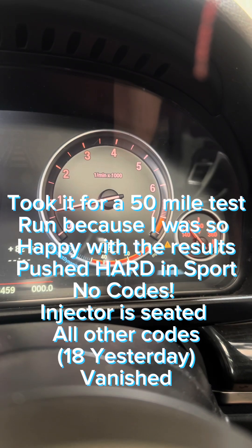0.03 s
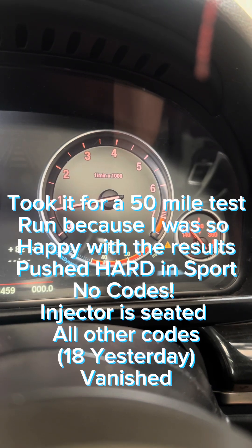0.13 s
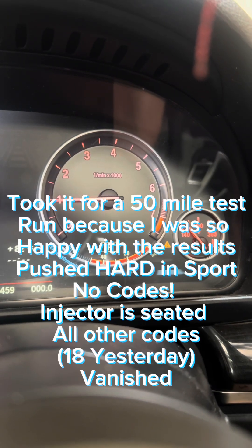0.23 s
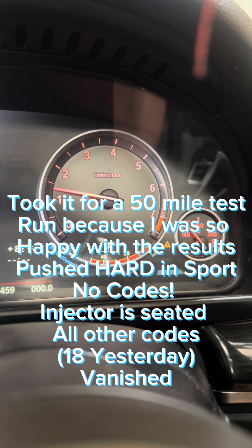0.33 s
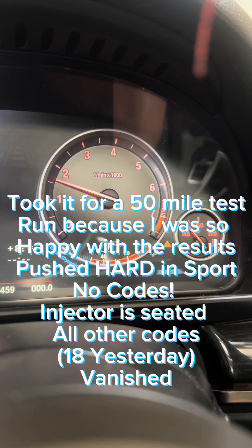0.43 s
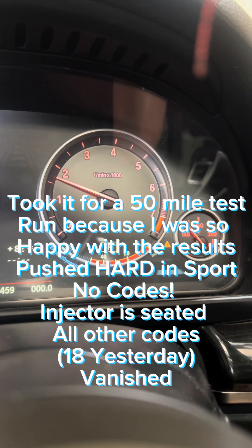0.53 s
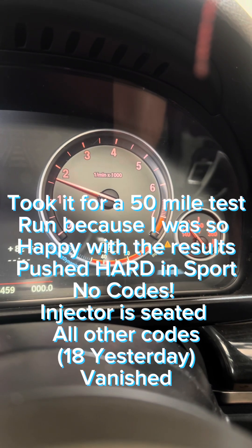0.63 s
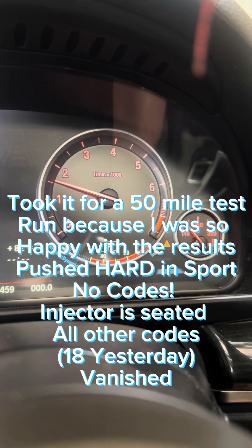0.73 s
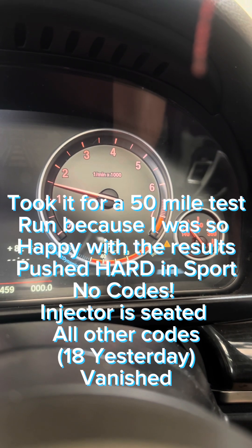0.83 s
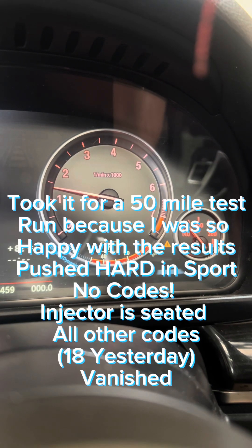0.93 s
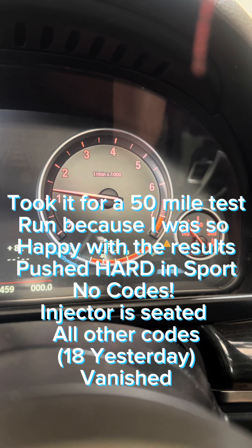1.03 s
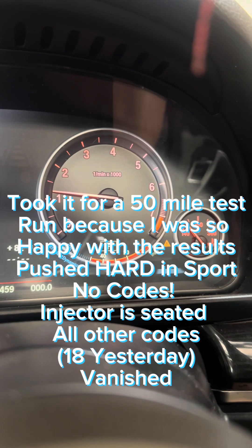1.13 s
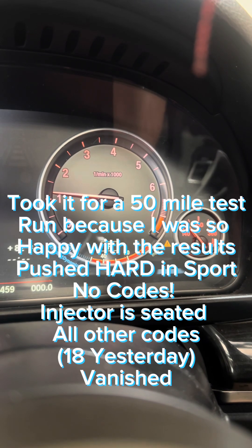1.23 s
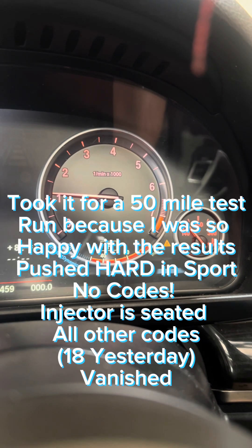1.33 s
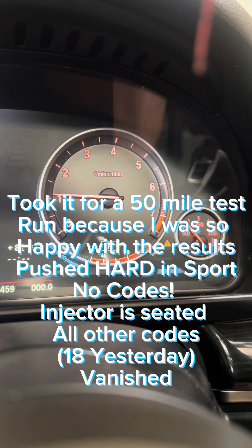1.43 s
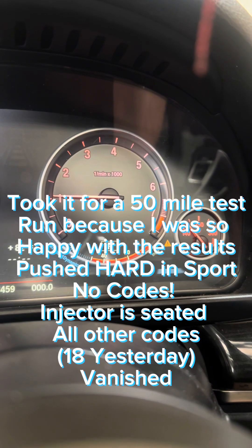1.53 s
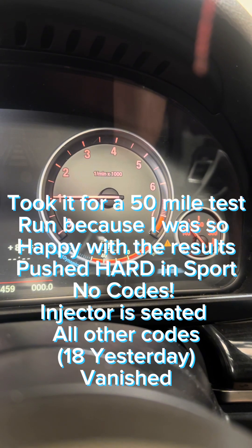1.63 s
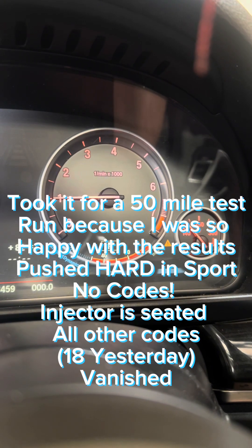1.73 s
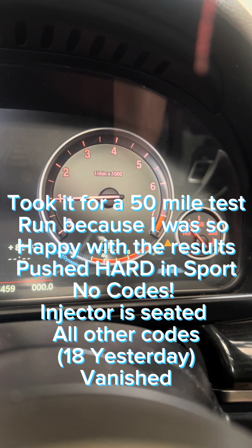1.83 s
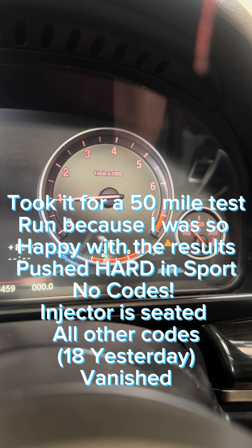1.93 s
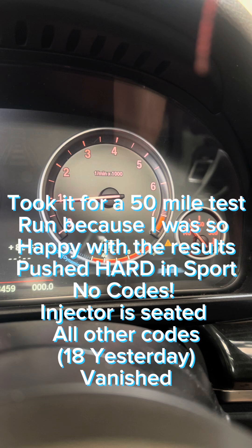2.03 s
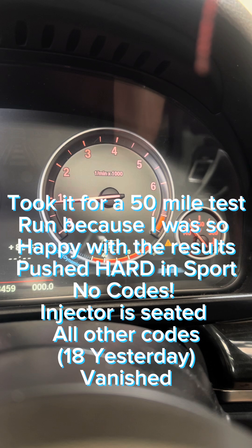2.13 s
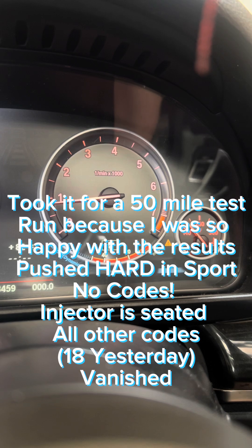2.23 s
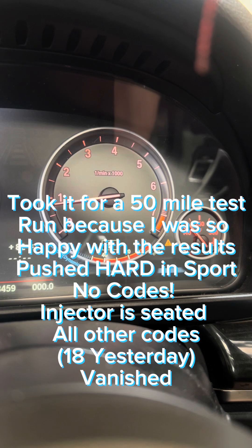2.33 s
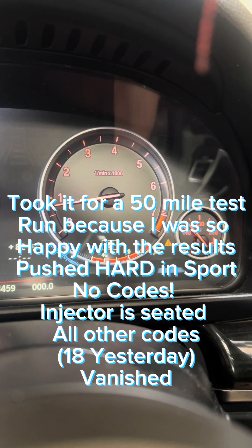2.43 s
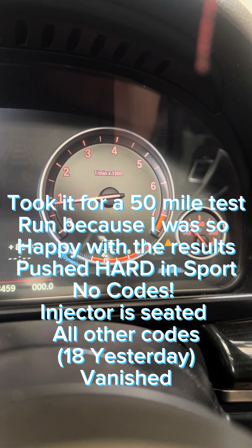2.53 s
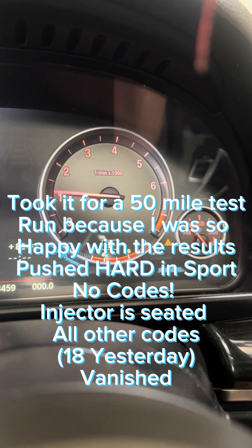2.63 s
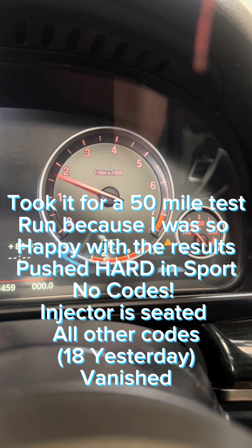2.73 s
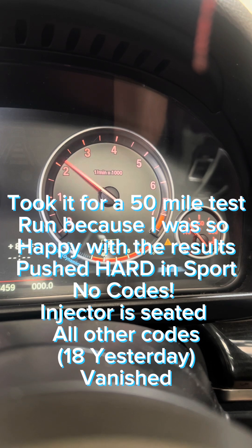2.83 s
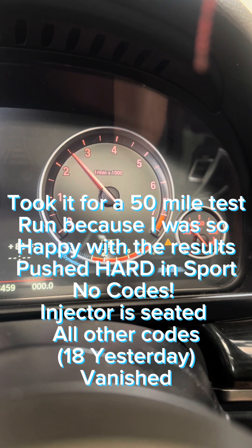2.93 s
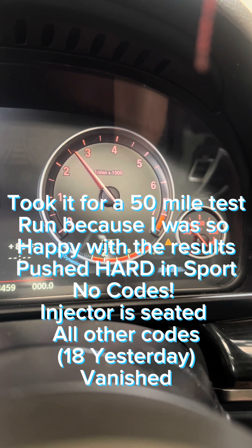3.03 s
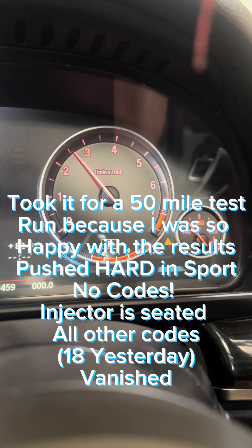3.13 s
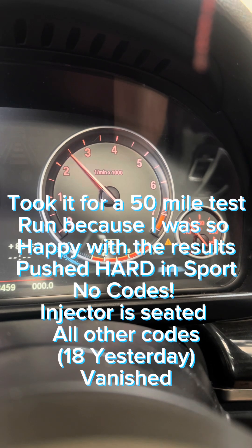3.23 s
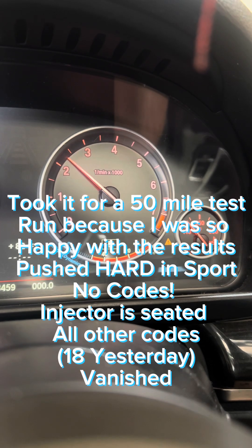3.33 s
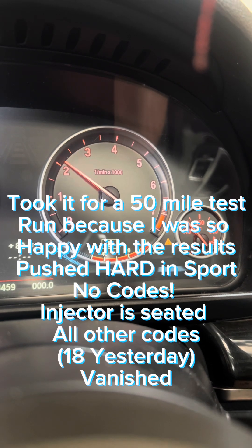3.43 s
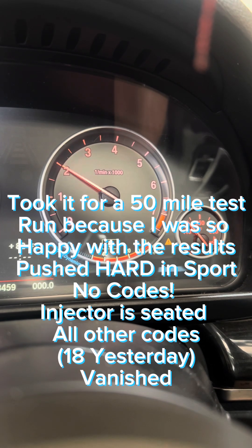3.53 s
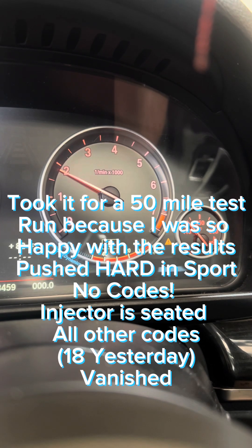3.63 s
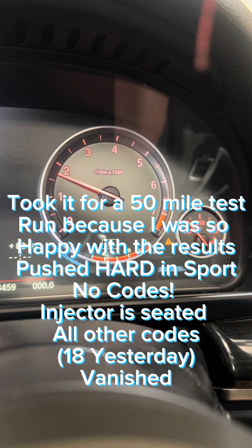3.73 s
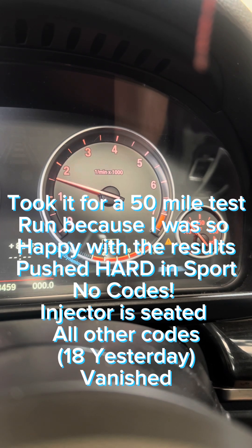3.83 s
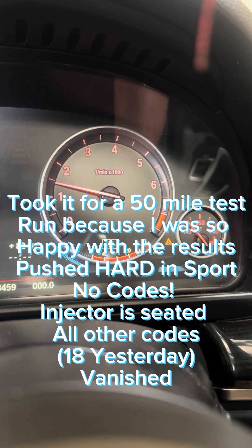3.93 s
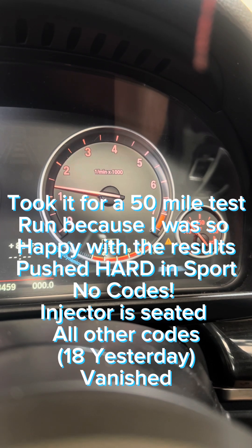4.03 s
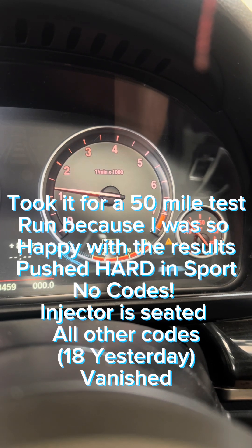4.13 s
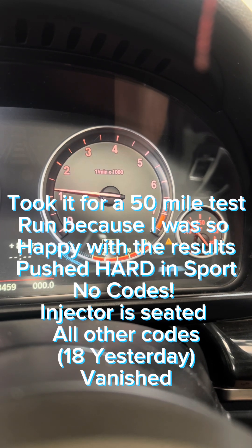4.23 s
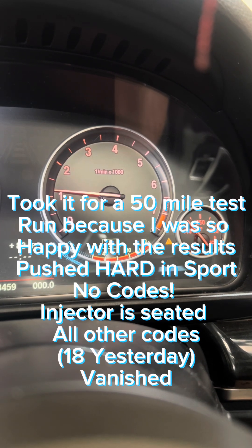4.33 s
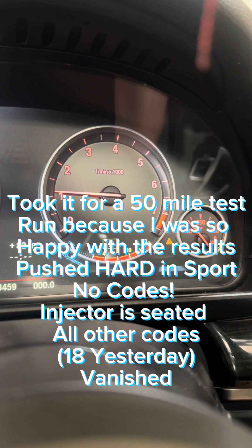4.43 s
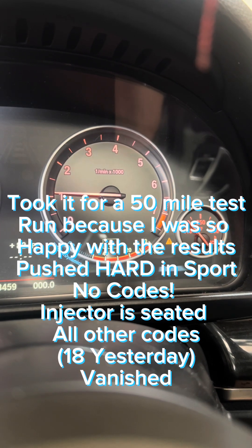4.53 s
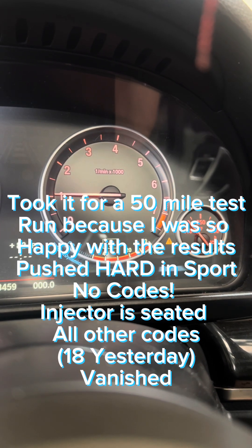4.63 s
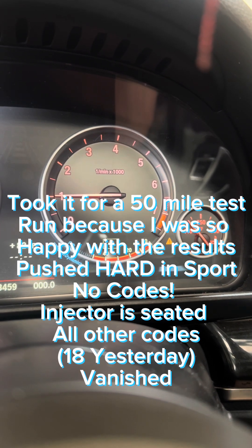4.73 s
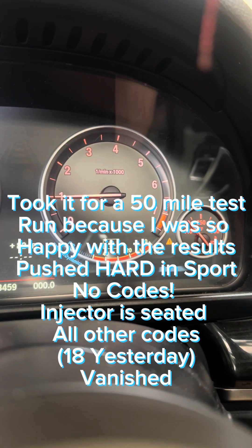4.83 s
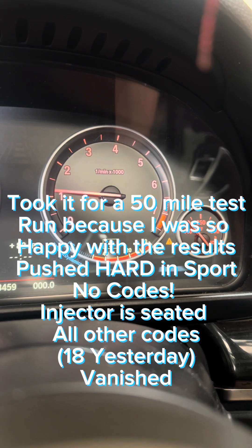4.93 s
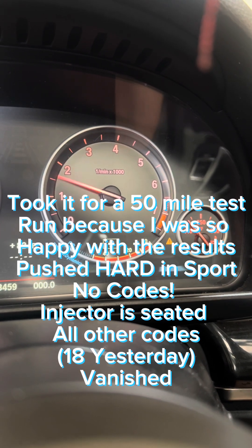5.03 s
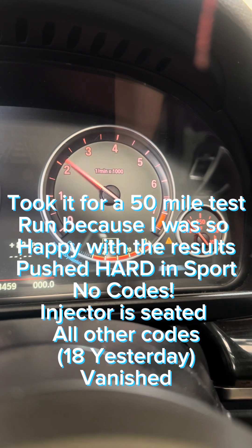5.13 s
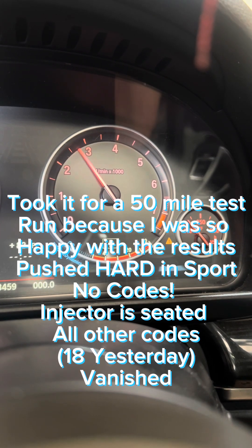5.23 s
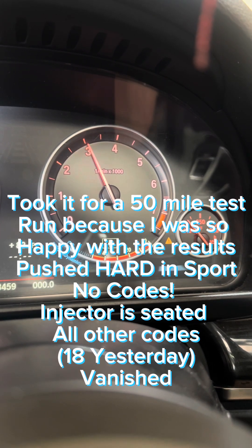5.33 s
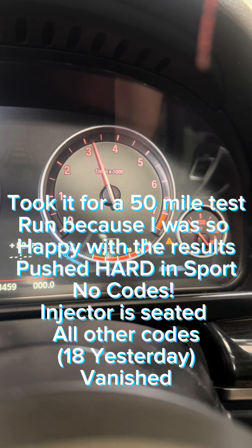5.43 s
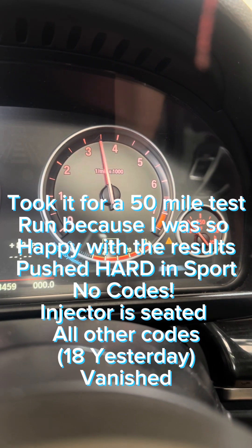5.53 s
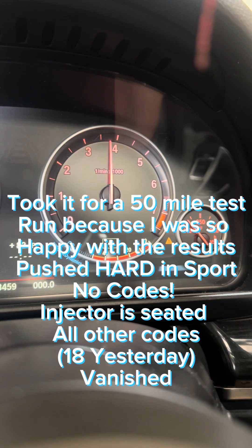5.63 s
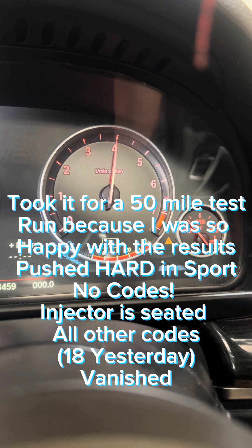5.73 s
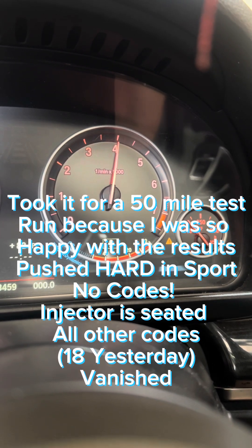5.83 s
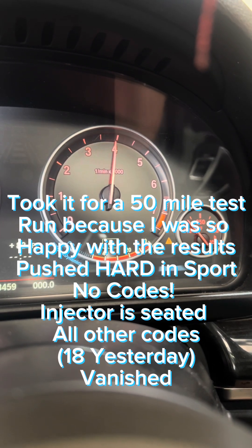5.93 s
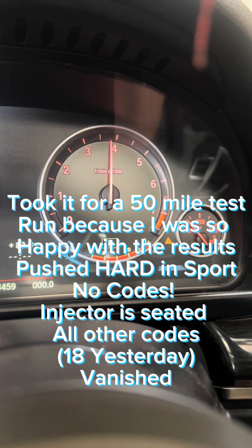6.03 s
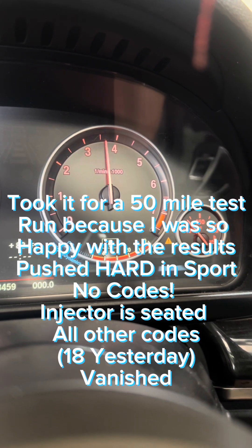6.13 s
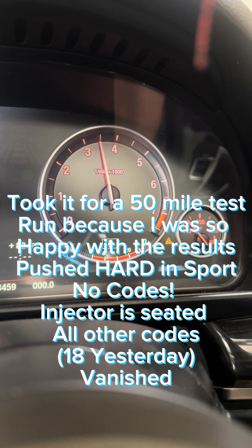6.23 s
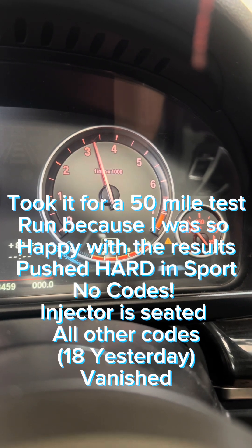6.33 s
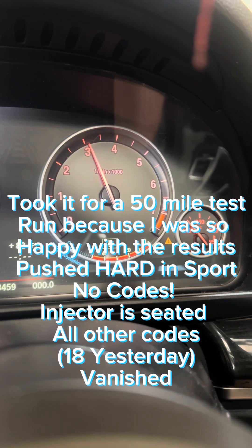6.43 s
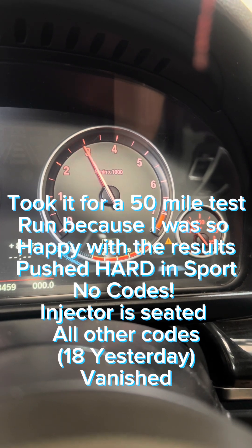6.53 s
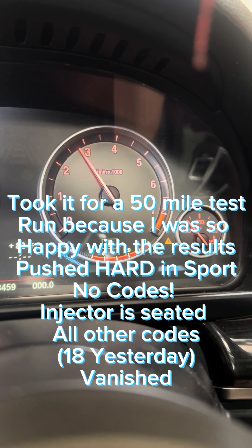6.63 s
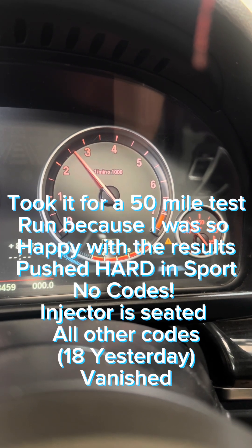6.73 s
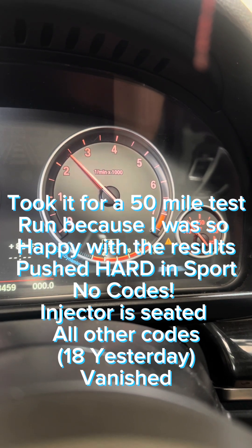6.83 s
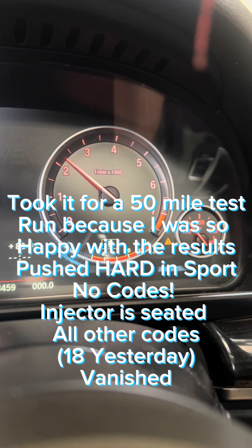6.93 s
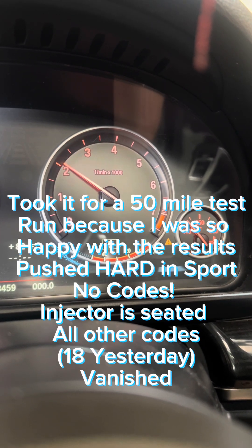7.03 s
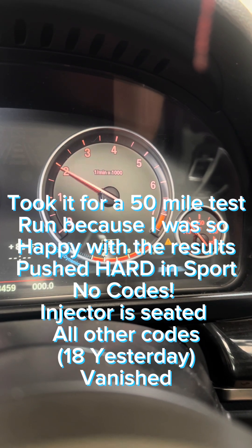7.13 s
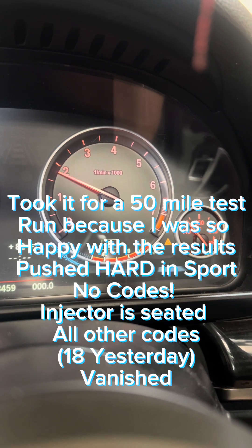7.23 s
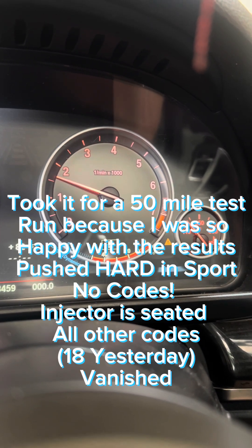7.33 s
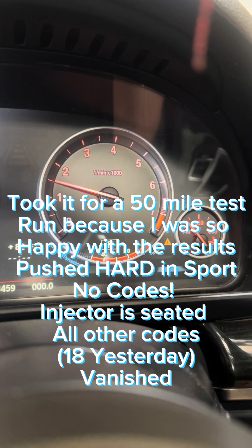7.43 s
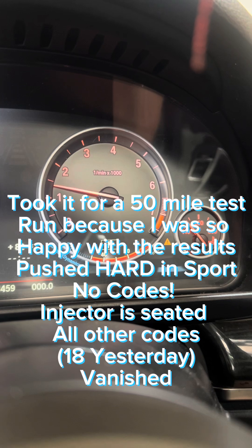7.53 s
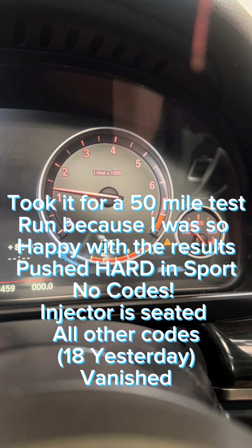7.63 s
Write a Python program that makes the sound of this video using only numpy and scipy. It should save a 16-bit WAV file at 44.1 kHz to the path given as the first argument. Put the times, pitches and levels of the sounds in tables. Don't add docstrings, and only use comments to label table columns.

```python
import sys
import numpy as np
from scipy import signal
from scipy.fft import rfft, irfft, next_fast_len
from scipy.io import wavfile
from scipy.ndimage import uniform_filter1d

SR = 44100
rng = np.random.default_rng(int(sys.argv[2]) if len(sys.argv) > 2 else 0)


def gain_from_decibels(decibels):
    exponent = np.asarray(decibels, float) / 20
    return 10 ** exponent


def file_out(sig):
    cols = np.atleast_2d(sig).T
    lim = np.clip(cols, -1, 1)
    pcm = np.round(lim * 32767).astype(np.int16)
    wavfile.write(sys.argv[1], SR, pcm)


N = 338247
FREQ = np.fft.rfftfreq(next_fast_len(N + SR // 4), 1 / SR) + 1e-3


def on_log(table):
    hz, value = np.transpose(table)
    return np.interp(np.log(FREQ), np.log(hz), value)


def along(table):
    s, *columns = np.transpose(table)
    return [np.interp(np.arange(N) / SR, s, c) for c in columns]


def by_speed(table, cycle_hz):
    hz, *columns = np.transpose(table)
    return [np.interp(cycle_hz, hz, c) for c in columns]


def shape(x, gain):
    size = 2 * len(FREQ) - 2
    return irfft(rfft(x, size) * gain, size)[:N]


def even(x, span_s):
    k = int(span_s * SR)
    power = uniform_filter1d(uniform_filter1d(x ** 2, k), k)
    return x / np.sqrt(power + 1e-12)


def walk(rate, size=1):
    k = int(SR / rate / size)
    held = np.repeat(rng.standard_normal(N // size // k + 2), k)
    return 1.11 * uniform_filter1d(uniform_filter1d(held, k), k)[:-(-N // size)]


def mode(hz, f_hz, width_hz):
    return 1 / (1 + 1j * (hz / f_hz - f_hz / hz) * f_hz / width_hz)


# t/s, f/Hz
SPEED = [(0, 8), (.3, 15.5), (.98, 9.7), (1.4, 8), (2.33, 6.3), (2.6, 17), (2.72, 23.2), (2.88, 22.9),
         (3.5, 14.8), (4, 10.3), (4.4, 8.25), (4.75, 7.1), (5.02, 23.2), (5.27, 27), (5.5, 32.8),
         (5.66, 33.2), (7.1, 14.7), (7.67, 9.6)]


def engine_speed():
    return uniform_filter1d(along(SPEED)[0], SR // 12, mode="nearest")


# press t/s, held t/s, opening [0-1]
BLIPS = [
    (-.1, .4, 1),
    (2.3, .47, 1),
    (4.75, .37, 1),
    (5.2, .4, .55),
    (5.68, .2, .3),
]


def pedal(cycle_hz):
    press_s, lift_s = .1, .17
    idle_load, idle_below_hz = .8, 9.6
    t = np.arange(N) / SR
    loads = [idle_load * np.clip(idle_below_hz - cycle_hz, 0, 1)]
    for s, held, opening in BLIPS:
        pressing = (t - s) / press_s
        lifting = 1 - (t - s - held) / lift_s
        loads.append(opening * np.clip(np.minimum(pressing, lifting), 0, 1))
    return np.max(loads, axis=0)


# t/s, level/dB
FLOW = [(0, -44.5), (.15, -37), (.4, -40.5), (1.0, -50), (2.33, -55), (2.58, -31), (2.72, -33),
        (2.85, -44.5), (3.25, -39), (3.65, -42.5), (3.99, -57), (4.76, -57), (4.96, -31.5), (5.29, -40.5),
        (5.51, -27.5), (5.7, -34.5), (6.4, -39.5), (7.67, -53.5)]


def pipe_flow():
    return along(FLOW)[0]


# t/s, level/dB
INTAKE = [(0, -57.5), (.15, -48.5), (.7, -52.5), (1.4, -58.5), (2.35, -61), (2.6, -42.5), (2.72, -48.5),
          (2.85, -54.5), (3.15, -50), (3.63, -53), (3.78, -61.5), (4.75, -63.5), (4.95, -46.5),
          (5.26, -48.5), (5.5, -41.5), (6.69, -53.5), (7.15, -58), (7.67, -63.5)]


def intake_flow():
    return along(INTAKE)[0]


# f/Hz, width/Hz, level/dB
CABIN = [(56.54, 10.96, 6), (75.6, 76.3, -11), (100.5, 3.6, -6.5), (140.6, 14.7, -8), (157.8, 25.2, -8.5),
         (185.74, 14.3, -5.5), (254.6, 9.8, -13.5), (294.8, 26, -26)]


def cabin(hz):
    body = sum(gain_from_decibels(db) * (-1) ** k * mode(hz, f, w) for k, (f, w, db) in enumerate(CABIN))
    return body / (1 + (44.8 / hz) ** 6) / (1 + (hz / 364.0) ** 4)


# multiple of the cycle rate, overrun level/dB, loaded level/dB
ORDERS = [(2, -26, -6.5), (3, 1, -0.5), (4, -16, -5.5), (5, -5, -5), (6, -12.5, -11), (7, -13.5, -17.5),
          (8, -14, -1.5), (9, -25, -3.5), (10, -13.5, -12), (11, -12, -10), (12, -17, -16.5),
          (13, -13.5, 0), (14, -14.5, -6), (15, -14.5, -28.5), (16, -13, -6), (18, -10, -2),
          (19, -15, -19.5), (21, -13.5, -9), (24, -9.5, -13.5)]
# cycle rate f/Hz, coasting level/dB, loaded level/dB
UNEVEN = [(8.5, -6, -6), (10, 3, 4), (16.3, 1, 0), (18, -15, -6), (22, -16, -8), (29, -14, -5),
          (33, -14, -15)]


def exhaust(cycles, cycle_hz, throttle):
    start = rng.uniform(0, 2 * np.pi, 32)
    turn, hz, load = cycles[::8], cycle_hz[::8], throttle[::8]
    steady = 0
    for k, coast_db, load_db in ORDERS:
        k = int(round(k))
        size = gain_from_decibels(coast_db + load * (load_db - coast_db) + 3.0 * walk(8, size=8))
        steady = steady + size * np.abs(cabin(k * hz)) * np.sin(2 * np.pi * k * turn + start[k])
    steady = signal.resample_poly(steady, 8, 1)[:N]

    firing = np.floor(8 * cycles)
    scatter = np.diff(firing, prepend=0) * rng.standard_normal(4000)[firing.astype(int)]
    scatter = shape(scatter, cabin(FREQ) * (1 + 1.5 * np.abs(mode(FREQ, 56, 16)) ** 2))
    coasting_db, loaded_db = by_speed(UNEVEN, cycle_hz)
    uneven_db = coasting_db + np.minimum(2 * throttle, 1) * (loaded_db - coasting_db)
    return even(steady, 0.05) + gain_from_decibels(uneven_db) * even(scatter, 0.32)


# t/s, boom
# level/dB, drone level/dB
HEAVES = [(.06, 6.5, 0.7), (.14, 3, .3), (.2, 5, -1.5), (0.298, -26, 5), (0.441, 5, -1.8),
          (0.491, -4.5, -11), (0.659, 4.5, 3), (0.748, -8.5, 13), (.83, 6, 2.5), (1.501, 7, -6.5),
          (5.39, -3, 4), (1.941, 5.5, 2), (2.42, 9, 6.5), (2.501, 4, -0.5), (2.65, -11, 1.5),
          (2.879, -11.5, 5), (4.06, 2.5, 1.5), (4.16, -10.5, 6), (4.23, -13, -4.5), (4.309, -21.5, -6.2),
          (4.79, 5, 11), (4.85, 4.5, 10), (4.95, -9.5, 4.5), (5.082, -6, 6.5), (5.131, 2, -3),
          (5.229, -9.5, 4.5), (5.57, -3.5, 5.5), (5.639, -4.5, -8.5), (5.771, 5.5, 4), (6.072, -8, 3.5),
          (3.351, 5.5, 3.5), (3.399, -0.5, -1.5), (3.501, -5.5, 5), (3.57, -1.5, -7), (3.63, .3, 9),
              (3.89, 5, 1), (3.931, -8.5, 2), (4.0, -3.5, 10), (6.9, 0.9, 8.5), (6.96, -12.5, 8.5),
              (7.051, 1, -4.5), (7.111, -12.5, 11.5), (7.2, 0.5, -1), (7.25, 2.5, 14), (7.358, 5, 9.5),
              (7.43, 4.5, -4.5), (7.5, -4.5, 2.5), (7.62, -7, -1)]
# heavy beat t/s, lasts +- t/s, depth level/dB
LOPE = [
    (1.385, .36, 4),
    (4.59, 0.3, 6.5),
]


def heave(cycles):
    burn_s = 0.032
    t = np.arange(N) / SR
    boom_db, drone_db = sum(np.outer([boom, drone], np.exp(-((t - s) / burn_s) ** 2))
                            for s, boom, drone in HEAVES)
    for s, span, depth in LOPE:
        beat = np.cos(2 * np.pi * (cycles - cycles[int(s * SR)]))
        boom_db = boom_db + depth * np.exp(-((t - s) / span) ** 2) * beat
    return boom_db, drone_db


# cycle rate f/Hz, boom level/dB, drone level/dB
SWEEP = [(7, -2.5, 3.5), (11, 2, 5), (15.3, 2.5, 1), (20.43, 10, 0.5), (22.34, 0.5, 2.5), (25, -0.5, -3.5),
         (29.2, -5, -2), (32.4, -1.5, -6)]


def boom_and_drone(pipe, cycles, cycle_hz, flow_db):
    flow = flow_db + 45
    boom_db, drone_db = np.add(by_speed(SWEEP, cycle_hz), heave(cycles))
    split = 1 / (1 + (FREQ / 112.7) ** 10)
    boom = gain_from_decibels(-21 + 0.4529 * flow + boom_db) * even(shape(pipe, split), 0.052)
    drone = gain_from_decibels(-26.5 + 1.2533 * flow + drone_db) * even(shape(pipe, 1 - split), 0.08)
    return boom + drone


# f/Hz, level/dB per Hz
ROAR = [(180, -39.5), (300, -2), (451, -11.5), (580, -5), (629, -12.5), (677, -15), (768, -8.5),
        (871, -6.5), (1140, -12), (1230, -10.5), (1390, -10.5), (1510, -10.5), (2600, -26.5), (3380, -56),
        (5720, -120)]
# f/Hz, width/Hz, level/dB
PANELS = [(385, 110, -1), (360, 22, -8.5), (504, 17, -1), (607, 73, -11.5), (687, 55, 8.5), (873, 5.4, 7),
          (1040, 150, -1), (1258, 7.7, 10.5), (1546, 88, -11.5), (1736, 14, 1.5)]


def roar_colour():
    panels = sum(gain_from_decibels(db) * np.abs(mode(FREQ, f, w)) ** 2 for f, w, db in PANELS)
    return gain_from_decibels(on_log(ROAR)) * (1 + panels)


CYLINDERS = [.75, -.3, .7, .6, -.3, .75, -.2, -.3]


def snarl(cycles, cycle_hz, drive):
    firing = np.floor(8 * cycles).astype(int)
    pulses = np.diff(firing, prepend=0) * np.array(CYLINDERS)[firing % 8]
    body = roar_colour() / (1 + (FREQ / 900.0) ** 4)
    return even(shape(pulses, body), .2) * drive * (cycle_hz / 33) ** 3


def gas(cycles, colour, depth, flicker_db, rate):
    puff = 1 + depth * np.cos(2 * np.pi * 8 * cycles)
    flutter = gain_from_decibels(flicker_db * walk(rate))
    return [even(shape(rng.standard_normal(N) * puff, colour), 0.14) * flutter for _ in range(2)]


def exhaust_roar(cycles, flow_db):
    paths = gas(cycles, roar_colour(), depth=0.087, flicker_db=-1.17, rate=47)
    return [gain_from_decibels(flow_db) * path for path in paths]


# f/Hz, level/dB per Hz
HISS = [(1290, -25), (2200, -4.5), (2530, -5), (3660, -7), (4400, -10), (5050, -8.5), (5980, -13.5),
        (7000, -14.5), (8130, -19), (9630, -13.5), (10300, -21), (11200, -15), (12500, -23), (13800, -32.5)]


def intake_hiss(cycles, intake_db):
    paths = gas(cycles, gain_from_decibels(on_log(HISS)), depth=0.043, flicker_db=0.8, rate=27)
    return [gain_from_decibels(intake_db) * path for path in paths]


def injectors(cycles, cycle_hz, intake_db):
    ticks = gas(cycles, mode(FREQ, 7700, 1000) ** 2, depth=0.27, flicker_db=1.8, rate=22)[0]
    return gain_from_decibels(intake_db - 10.0) * 7.3 / cycle_hz * ticks


# t/s, peak level/dB, bright share level/dB, decay t/s, rise t/s
POPS = [(0.051, -25.5, -30.5, 0.77, 0.0012), (0.71, -27, -40, 0.56, 0.02), (2.385, -38, -20, 0.61, 0.0013),
        (2.419, -25, -27.5, 0.99, 0.004), (3.628, -16.5, -13.5, 0.2, 0.00075),
        (3.643, -35, -36, 0.47, 0.001), (4.784, -34.5, -21, 0.65, 0.0027), (4.812, -35, -22, 1, 0.0011),
        (5.47, -13.5, -24.5, 0.37, 0.02), (6.884, -29, -44, 0.41, 0.0014),
        (7.096, -25.5, -29.5, 0.39, 0.001), (7.242, -21, -26.5, 0.36, 0.001)]
BURBLES = [
    (0.145, -23, -32.5, 0.18, 0.0089),
    (2.66, -14.5, -33.5, 0.14, 0.02),
    (3.361, -14, -44, 0.17, 0.022),
    (3.486, -20.5, -46, 0.21, 0.014),
    (3.504, -30, -30, 0.17, 0.032),
    (4.97, -14, -57, 0.08, 0.03),
    (5.335, -21.5, -24.5, 0.56, 0.02),
    (6.917, -23, -39.5, 0.22, 0.025),
]


def pops():
    thud, dull, bright = np.zeros(N), np.zeros(N), np.zeros(N)
    t = np.arange(SR // 2) / SR
    for s, peak_db, bright_db, t60, rise in [*POPS, *BURBLES]:
        i = int(s * SR)
        tail = np.exp(-np.log(1000) * t / max(t60, .02))
        crack = 0.26 * np.exp(-t / (0.0068 + 2 * rise))
        burst = ((1 - np.exp(-t / max(rise, 3e-4))) * (tail + crack))[:N - i]
        thud[i] += gain_from_decibels(peak_db) * (rise < .005)
        dull[i:i + len(burst)] += gain_from_decibels(peak_db) * burst
        bright[i:i + len(burst)] += gain_from_decibels(peak_db + bright_db) * burst
    knock = gain_from_decibels(43.5) * shape(thud, cabin(FREQ) * mode(FREQ, 190, 150))
    low = gain_from_decibels(9.5) * roar_colour() * mode(FREQ, 940, 2100)
    high = gain_from_decibels(9) * (mode(FREQ, 2250, 1100) ** 2 - .5 * mode(FREQ, 3300, 900) ** 2)
    return [knock + shape(dull * rng.standard_normal(N), low) + shape(bright * rng.standard_normal(N), high)
            for _ in range(2)]


# t/s, f/Hz, level/dB
WHINE = [(.8, 1800, -80), (.95, 1720, -60), (1.25, 1610, -58), (1.5, 1510, -60), (1.75, 1450, -72),
         (1.9, 1420, -95)]


def whine():
    hz, level_db = along(WHINE)
    turns = np.cumsum(hz + 25.0 * walk(60)) / SR
    return gain_from_decibels(level_db + 2.2 * walk(25)) * np.sin(2 * np.pi * turns)


# f/Hz, likeness [0-1]
ALIKE = [(40, 1), (150, .995), (320, .96), (420, .78), (560, .95), (900, .74), (1600, .75), (2100, .4),
         (2450, .65), (3100, .25), (4800, .2), (6200, .75), (7200, .68), (7900, 1), (8500, 1), (9300, .5),
         (9700, 1), (11000, 1), (11200, .5), (11800, .5), (12100, 1)]
# f/Hz, level/dB
LEAN = [(60, 0.5), (110, 0.5), (200, 2), (360, 4), (660, 0), (1210, 3.5), (2210, -0.5), (4020, 0.0),
        (7340, 0.0), (13400, 0.0)]
# f/Hz, phase/rad
LEAD = [(40, 0), (200, .08), (300, .3), (600, .6), (1030, 1.2), (1700, .3), (2100, 0), (2350, -3.1),
        (2900, -3.3), (3400, -6.4), (4200, -6.6), (5850, -9.6), (7900, -12.57), (8600, -12.57),
        (9700, -15.708), (11000, -15.708), (11700, -17.3), (12150, -18.85)]


def left_and_right(x, other):
    c = np.clip(on_log(ALIKE), 0, 1)
    half = gain_from_decibels(on_log(LEAN) / 2) * np.exp(.5j * on_log(LEAD))
    mid, side = np.sqrt((1 + c) / 2), np.sqrt((1 - c) / 2)
    left = shape(x, mid * half) + shape(other, side * half)
    right = shape(x, mid / half) - shape(other, side / half)
    return np.array([left, right])


def scene():
    cycle_hz = engine_speed()
    cycles, throttle = np.cumsum(cycle_hz) / SR, pedal(cycle_hz)
    flow_db, intake_db = pipe_flow(), intake_flow()

    pipe = exhaust(cycles, cycle_hz, throttle)
    low = boom_and_drone(pipe, cycles, cycle_hz, flow_db)
    low = low + gain_from_decibels(flow_db + 4) * snarl(cycles, cycle_hz, .1 + 1.3 * throttle)
    sources = exhaust_roar(cycles, flow_db), intake_hiss(cycles, intake_db), pops()
    near, far = (roar + hiss + pop for roar, hiss, pop in zip(*sources))
    near = near + injectors(cycles, cycle_hz, intake_db) + whine()

    from_end = np.minimum(np.arange(N), N - np.arange(N))
    edge = np.sin(np.pi / 2 * np.clip(from_end / (.025 * SR), 0, 1)) ** 2
    return left_and_right(edge * (low + near), edge * (np.roll(low, int(0.009 * SR)) + far))


def roll_off(x):
    return signal.sosfilt(signal.butter(12, 13980, fs=SR, output="sos"), x)


def record(dry):
    mix = np.tanh(1.205 * dry) * 1.008
    return roll_off(mix)


dry = scene()
out = record(dry)
file_out(out)
```